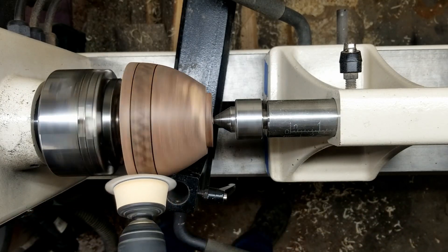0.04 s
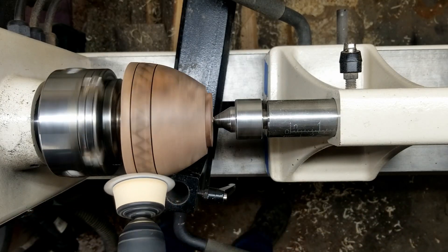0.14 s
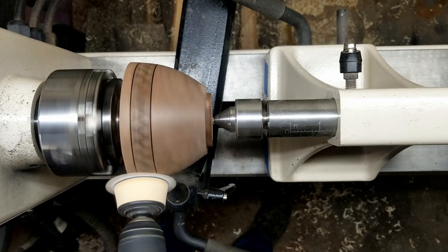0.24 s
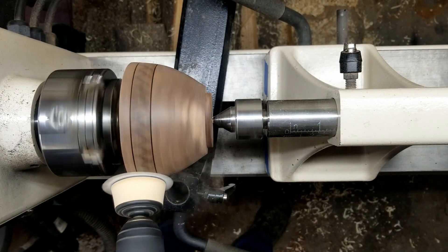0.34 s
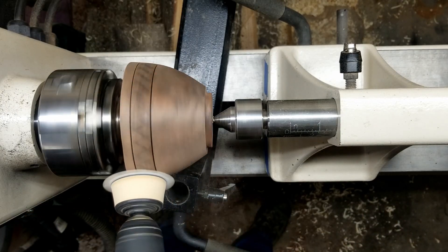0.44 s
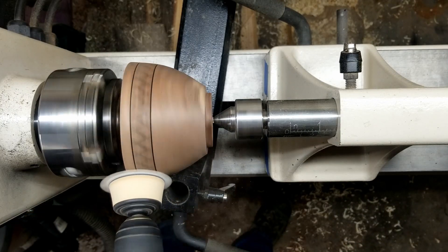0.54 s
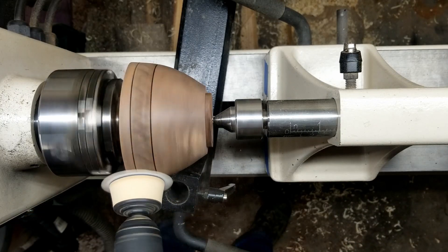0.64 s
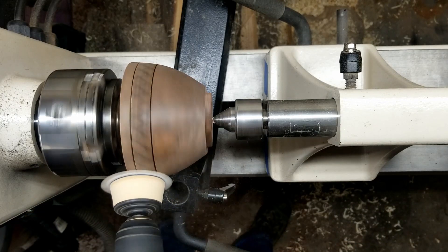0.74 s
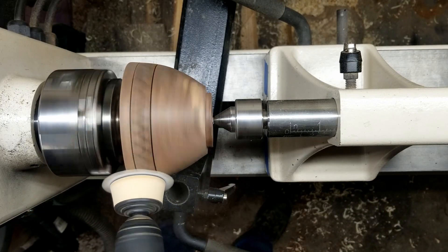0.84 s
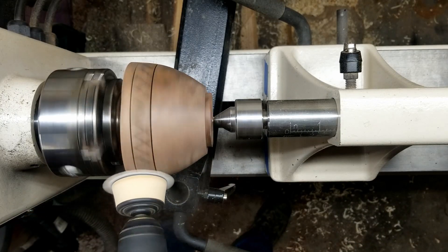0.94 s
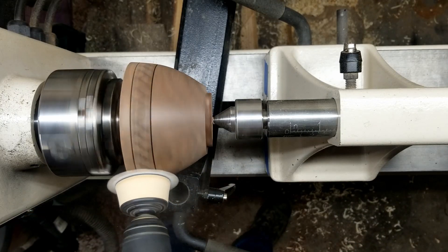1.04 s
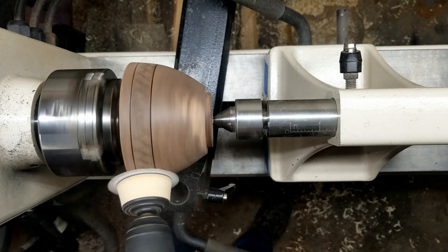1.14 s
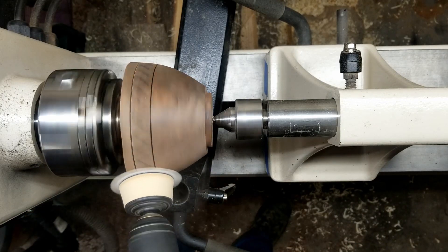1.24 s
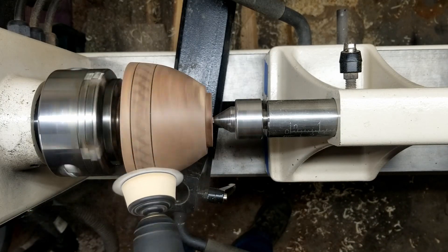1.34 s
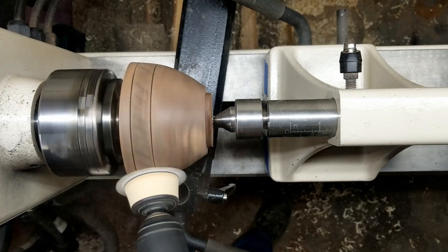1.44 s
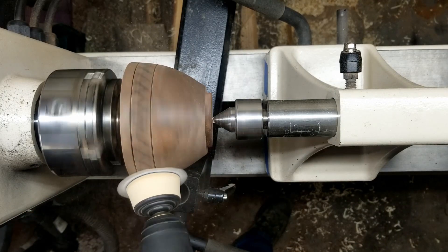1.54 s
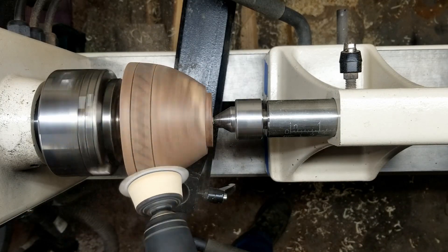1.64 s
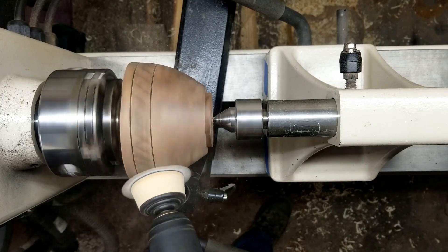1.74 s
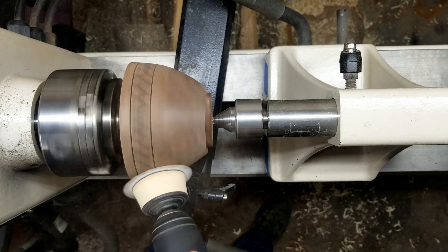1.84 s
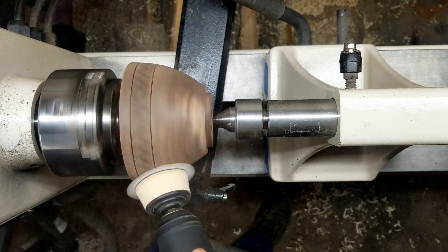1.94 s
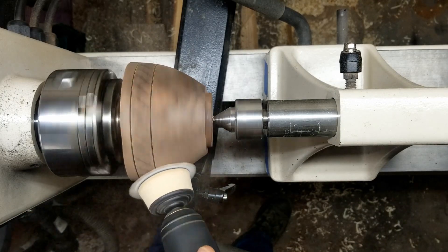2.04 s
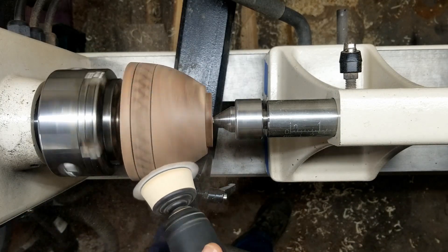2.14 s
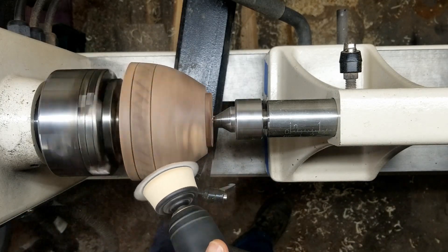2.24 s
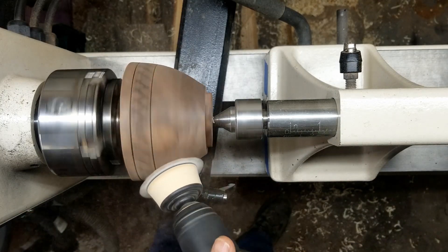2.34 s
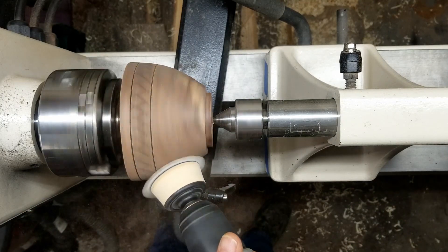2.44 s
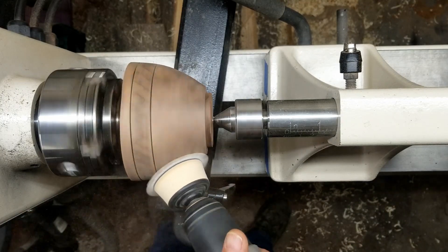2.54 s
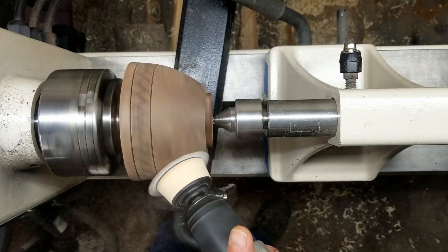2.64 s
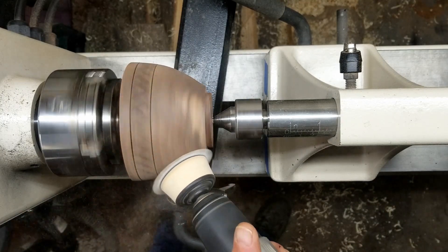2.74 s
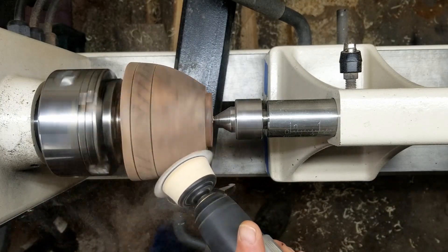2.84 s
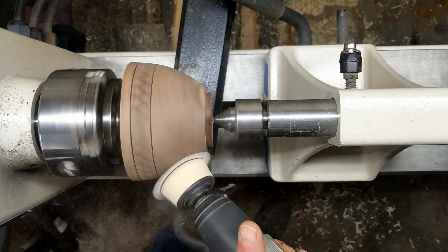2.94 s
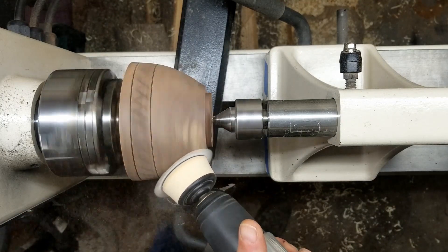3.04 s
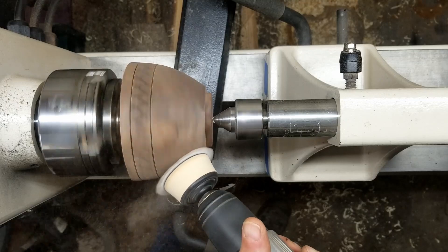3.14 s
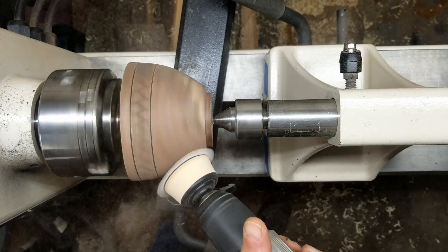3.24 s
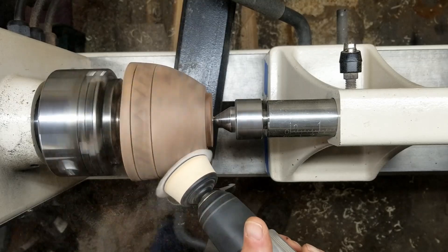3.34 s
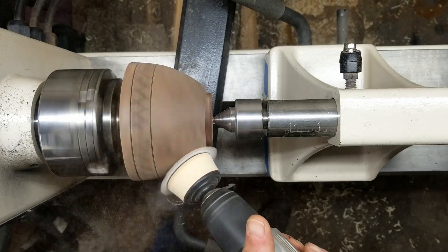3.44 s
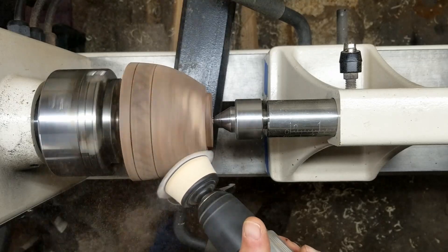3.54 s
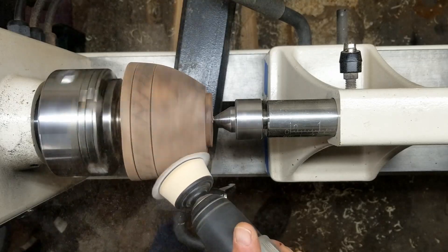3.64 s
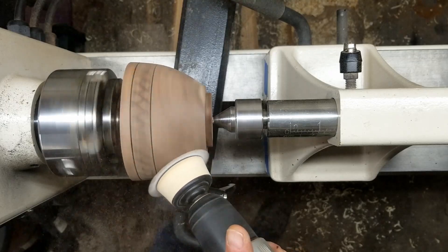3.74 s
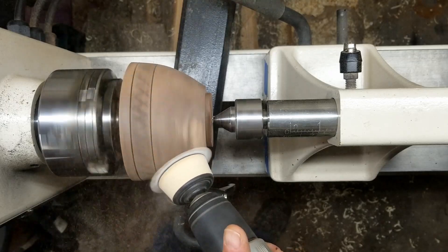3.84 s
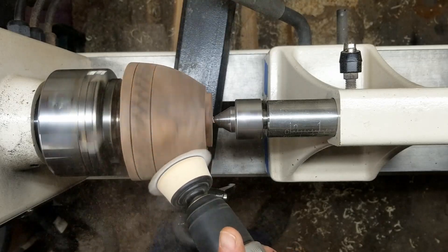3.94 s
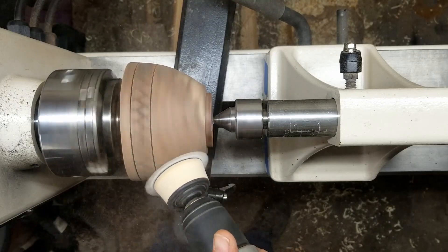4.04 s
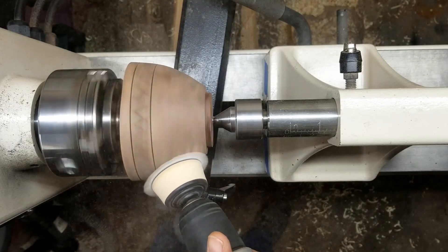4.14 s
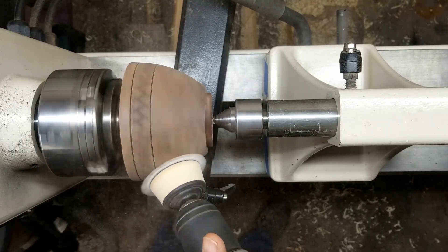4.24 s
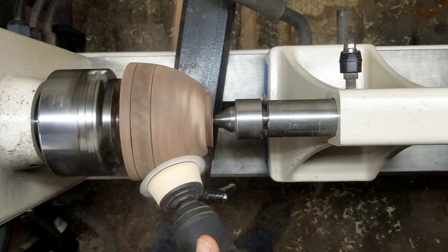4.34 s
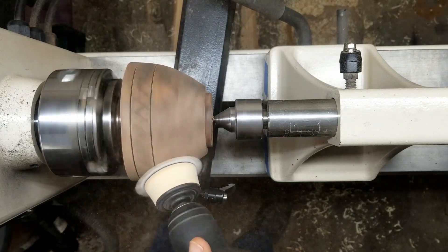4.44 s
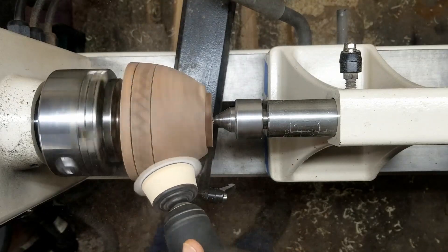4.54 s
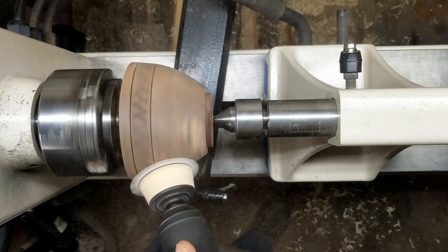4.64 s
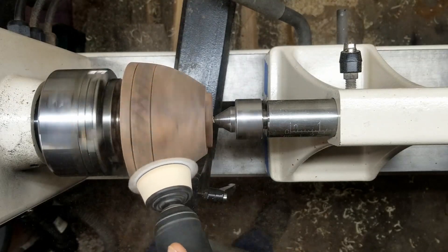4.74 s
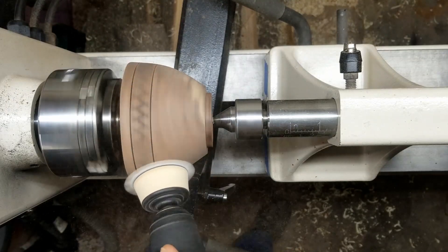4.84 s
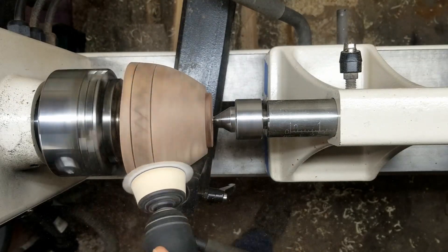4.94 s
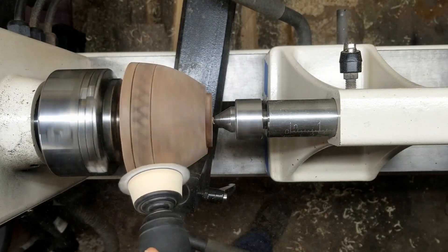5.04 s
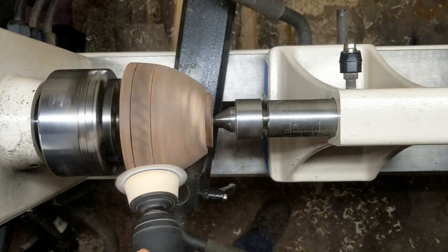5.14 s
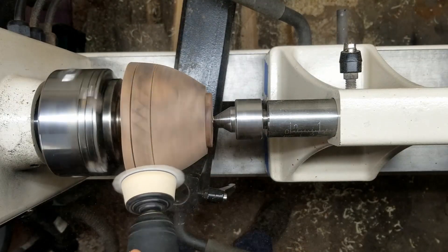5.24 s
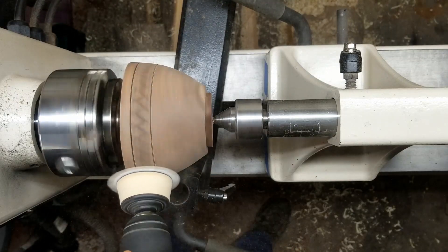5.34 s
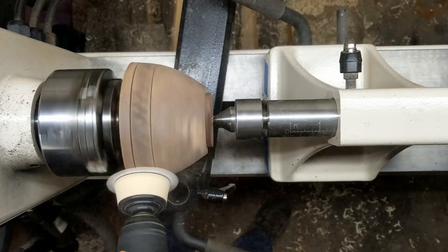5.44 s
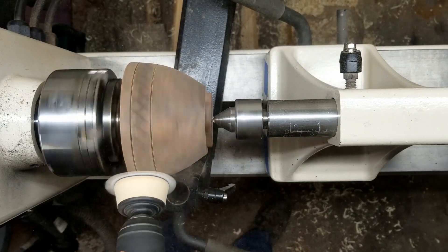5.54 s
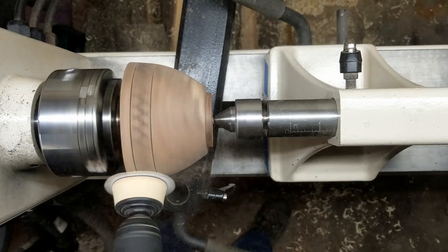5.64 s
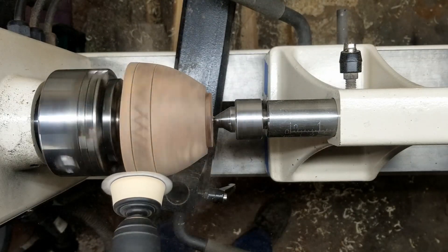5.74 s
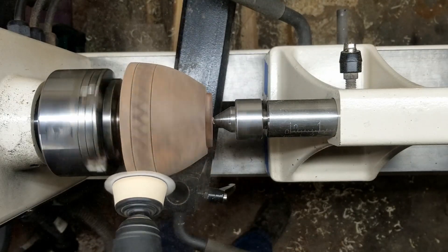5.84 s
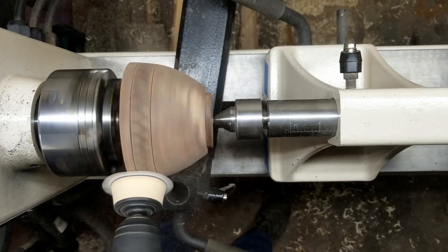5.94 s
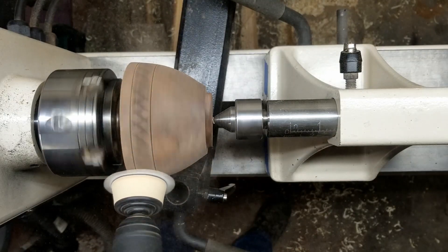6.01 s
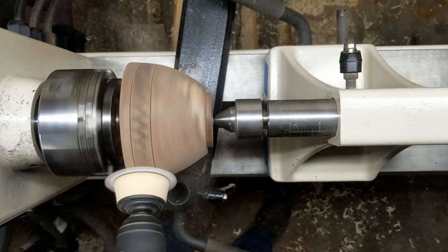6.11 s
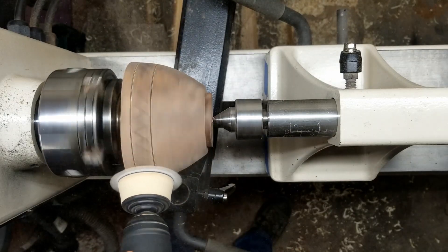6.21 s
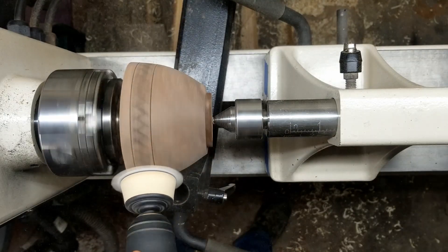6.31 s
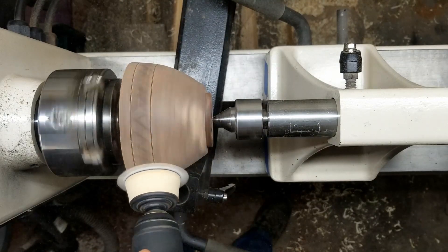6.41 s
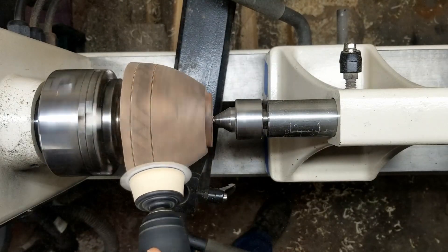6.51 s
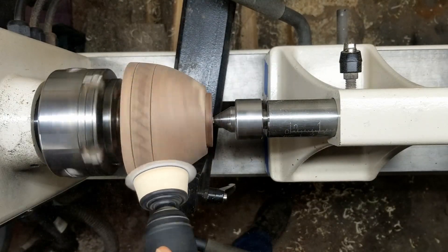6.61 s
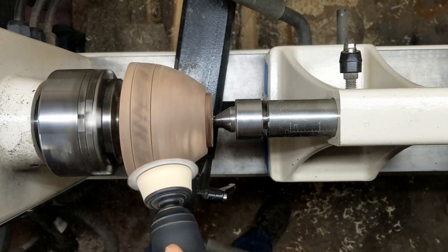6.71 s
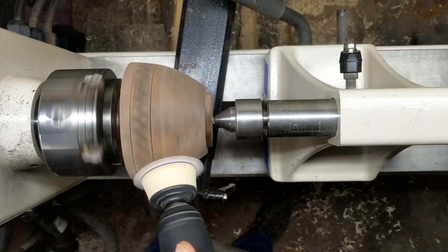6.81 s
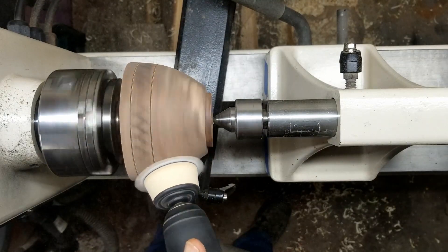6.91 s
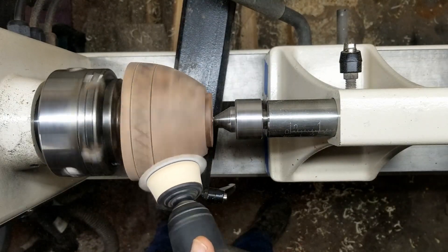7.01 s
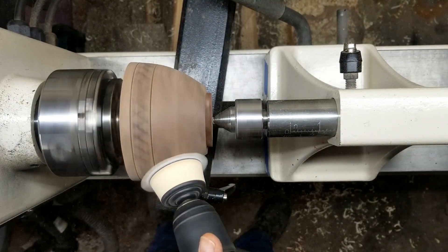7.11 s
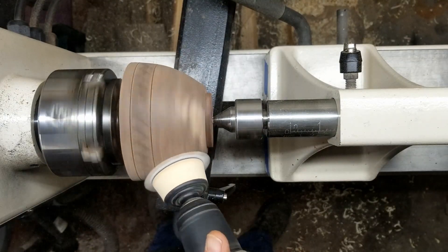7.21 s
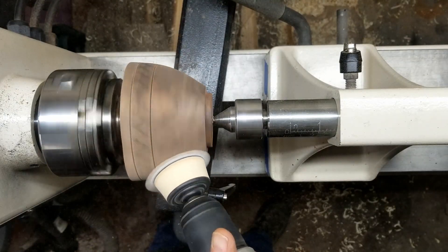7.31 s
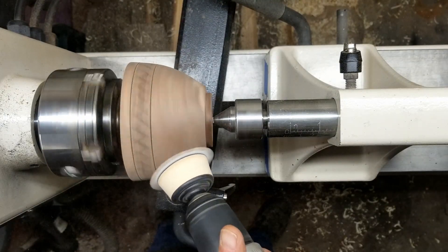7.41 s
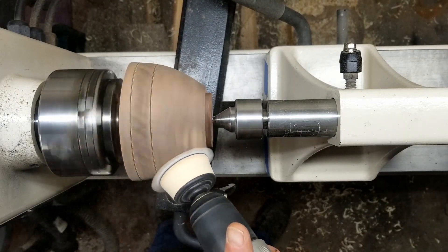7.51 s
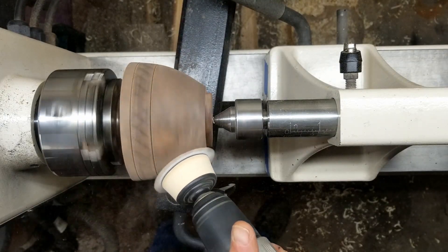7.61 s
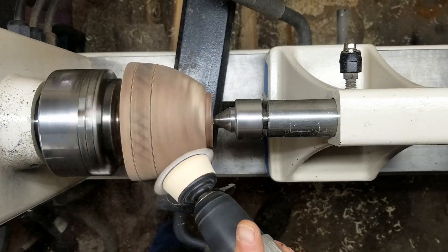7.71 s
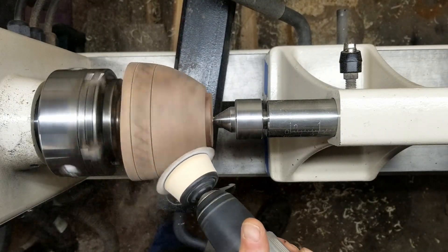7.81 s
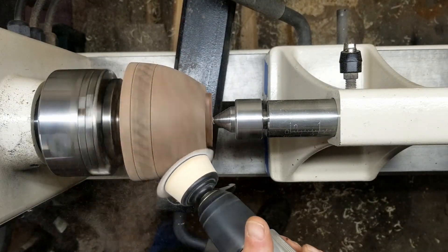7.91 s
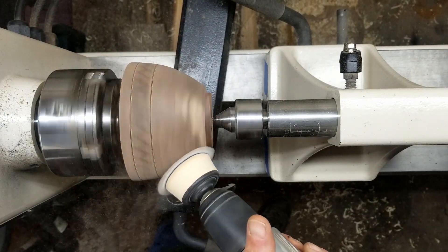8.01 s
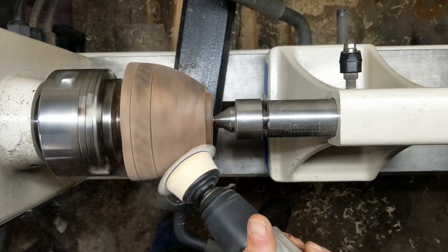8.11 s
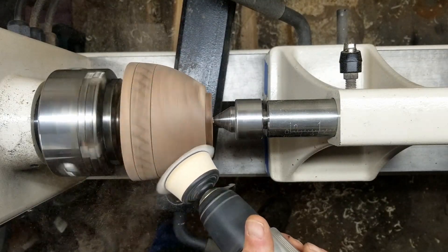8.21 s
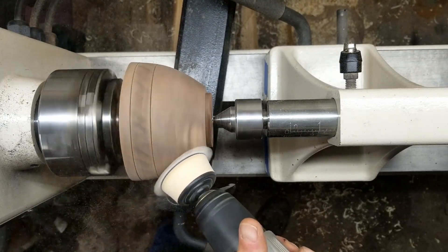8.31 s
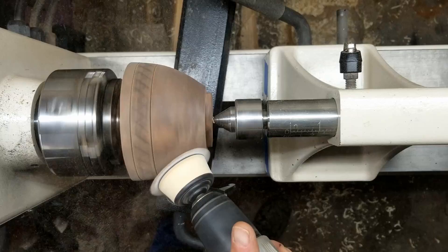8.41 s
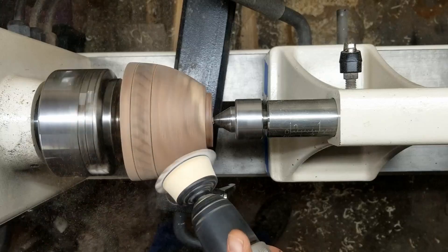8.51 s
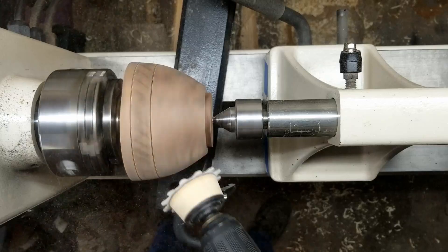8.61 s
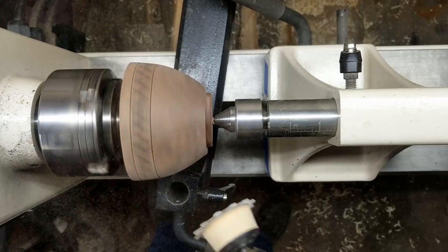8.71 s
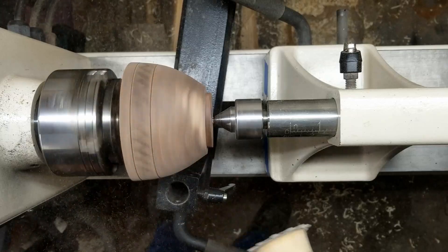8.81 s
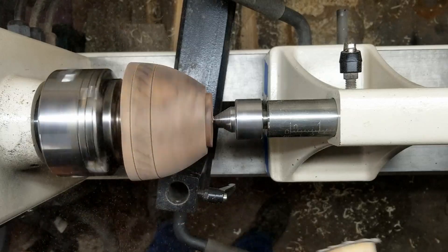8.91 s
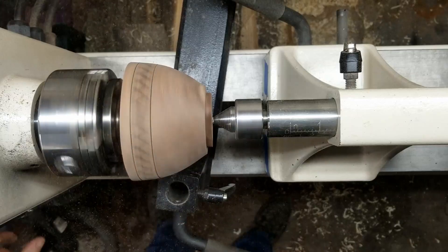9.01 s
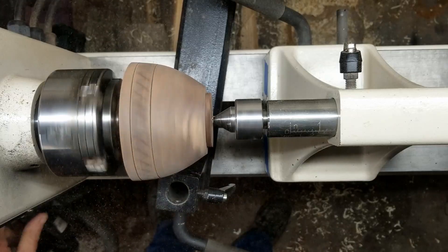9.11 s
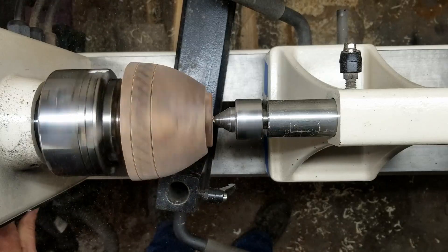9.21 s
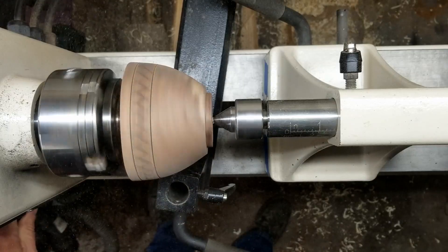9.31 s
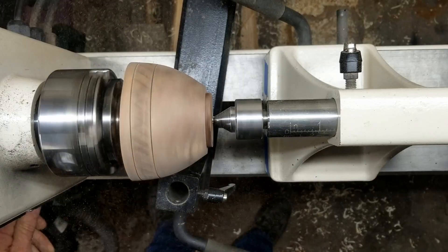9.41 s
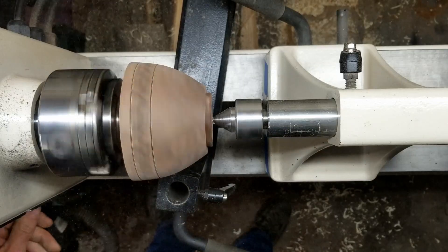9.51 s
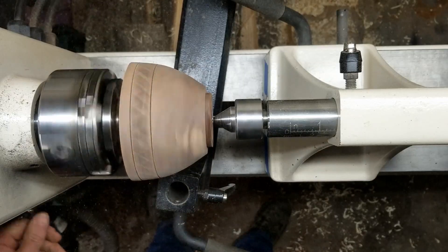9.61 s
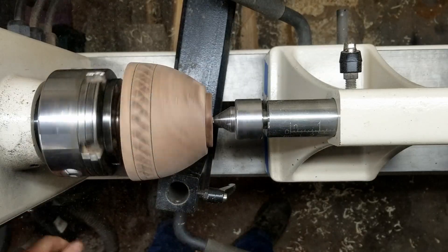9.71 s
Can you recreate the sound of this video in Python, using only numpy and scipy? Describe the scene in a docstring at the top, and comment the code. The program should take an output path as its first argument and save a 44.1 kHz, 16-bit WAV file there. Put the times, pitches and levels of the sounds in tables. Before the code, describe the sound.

Steady high electric drill whine and abrasive hiss against spinning wood, ended by a sharp plastic clack, leaving faint hum and a small switch click.

```python
"""A hand drill's whine comes first, with gear rattle and the bright hiss of a sanding disc on a wooden bowl.
The whine is sine waves tied to the shaft; the rattle is noise ringing in the housing; the hiss is many clicks.
The drill swings along the bowl, then a brake stops it with a clack, made of short blows into a plastic body.
The lathe still hums with noise and tones; its switch is pressed, and its belt tone sinks and fades.
A low rumble and the air of a small workshop lie underneath, and the room adds reverberation."""
import sys
import numpy as np
from scipy import signal
from scipy.io import wavfile
from scipy.ndimage import uniform_filter1d, map_coordinates

SR = 44100
rng = np.random.default_rng(int(sys.argv[2]) if len(sys.argv) > 2 else 0)


def dump_mix(stems):
    """Bounce the given channels to the path in sys.argv[1] as a 16-bit WAV at rate SR."""
    frames = np.atleast_2d(stems).T  # one column per channel
    limited = np.clip(frames, -1, 1)  # hard clip at full scale
    pcm = np.round(limited * 32767).astype(np.int16)
    wavfile.write(sys.argv[1], SR, pcm)


N = 430416

# Speed of the drill motor before it slows: (time [s], speed [turns/s])
MOTOR_SPEED = [(0.0, 327.7), (0.25, 327.7), (0.9, 322.5), (1.4, 320.5), (1.65, 318.9), (2.25, 317.8),
               (2.7, 319.5), (2.88, 318.6), (3.03, 316.1), (3.25, 317.2), (3.75, 316.5), (3.95, 319.1),
               (4.25, 318.9), (4.5, 318.0), (4.83, 319.8), (5.2, 318.0), (5.62, 317.8), (5.9, 319.7),
               (6.38, 320.8), (6.72, 323.8), (7.25, 321.5), (7.5, 322.2), (8.08, 316.7), (8.49, 317.5)]
TRIGGER_OFF_S, SLOWING_HZ_PER_S = 8.49, 293  # trigger let go, the shaft loses speed
GEARS_STOP_S, STOP_S = 8.566, 8.585  # end of the drill's tones, end of its noises
MESH_ORDER, BAR_ORDER = 5.79, 12  # gear mesh and commutator bars, as multiples of the turn rate

# The drill at work: (time [s], gear rattle rms level [dB], grit hiss rms level [dB], left minus right [dB])
WORK_LEVELS = [(0.0, -27.5, -25.5, 3), (0.8, -29.5, -26, 3.5), (1.4, -28, -25, 2.5), (2.1, -28, -26.5, 1.5),
               (3.4, -27.5, -25, 0.5), (4.4, -27.5, -25, 1), (5.2, -26.5, -23.5, 3.5),
               (5.6, -27.5, -25, 3.5), (6.2, -27.5, -24, 3), (7.1, -27.5, -26.5, 1.5),
               (7.9, -27.5, -25.5, 0), (8.55, -27, -26.5, 2.3)]

# Commutator whine: (time [s], rms level [dB], left minus right [dB], lead of the left side [turns of the tone])
COMMUTATOR_WHINE = [(0.0, -30, 7, 0.027), (0.45, -33, 2, 0.12), (0.64, -39, 3, -0.009),
                    (0.78, -35.5, 14, 0.19), (0.95, -40, 11, 0.38), (1.05, -41, 2, 0.45),
                    (1.16, -48, -6, 0.25), (1.25, -35.5, -4, 0.04), (1.45, -33, 1, .03),
                    (1.65, -36.5, 4, -0.17), (1.9, -38.5, 5, -0.15), (2.05, -39, 5, -0.26),
                    (2.25, -48, 2, -0.45), (2.5, -37, 6, -.3), (2.7, -34, 1, -0.61), (2.9, -34, -3, -0.53),
                    (3.05, -35, 0, -0.78), (3.25, -37.5, -3, -0.76), (3.55, -34.5, -4.5, -0.85),
                    (3.75, -33, 2, -0.75), (3.9, -35, 2, -0.49), (4.1, -35, -3, -0.38),
                    (4.3, -38, 1, -0.42), (4.45, -43, 4, -0.45), (4.53, -46, -10, -0.62),
                    (4.59, -40, 1, -1.2), (4.8, -36.5, 3, -1.15), (4.95, -37, 3, -0.89),
                    (5.05, -33, 5, -1.2), (5.3, -36, 10, -0.88), (5.65, -36.5, 11, -0.79),
                    (5.78, -38, 5, -0.74), (5.85, -39.5, 7, -0.8), (6.1, -38, 6, -0.56),
                    (6.35, -38, -3, -0.65), (6.5, -41, 2, -0.55), (6.74, -46, 6, -.6),
                    (6.83, -37, 8, -0.85), (6.98, -36, -3, -1.28), (7.15, -34, -6, -1.5),
                    (7.3, -39, 8, -1.7), (7.5, -36, 7, -1.3), (7.75, -33, 4, -1.63), (7.9, -34, -4, -1.58),
                    (8.1, -37, -3, -1.96), (8.3, -33, -4, -1.7), (8.45, -32, -4, -1.6),
                    (8.495, -48, 0, -1.7)]
GLIDE_FROM_S, GLIDE_DB = 8.5, -32.5  # from here this level replaces the table's

# Lower shaft tones: (time [s], rms level of order 1 [dB], of order 3 [dB], of the gear mesh [dB], of order 5 [dB])
LOWER_ORDERS = [(0.0, -56, -43, -53, -39), (0.3, -51, -43, -57, -34), (0.7, -69, -56, -50, -36),
                (1.15, -64, -58, -48, -37), (1.45, -65, -57, -39, -37), (1.7, -69, -50, -42, -39),
                (2.05, -66, -47, -37, -38), (2.25, -64, -54, -41, -40), (2.55, -55, -45, -38.5, -36),
                (3.0, -63, -48, -35, -39), (3.25, -58, -46, -33.5, -38), (3.5, -54.5, -50, -34.5, -37),
                (3.9, -58, -43, -34.5, -38), (4.15, -60, -45, -35.5, -34), (4.5, -55, -49, -33.5, -38),
                (4.85, -57.5, -45, -39.5, -38), (5.1, -56, -50, -35, -39), (5.3, -52, -45, -40.5, -37),
                (5.6, -52.5, -51, -37, -38), (5.8, -52, -45, -42, -38), (6.2, -56, -47, -40.5, -39),
                (6.6, -54, -43, -41, -37), (6.85, -50.5, -45, -40, -36), (7.1, -50.5, -43, -39, -36),
                (7.45, -48.5, -41, -35, -35), (7.8, -51.5, -47, -35, -35), (8.1, -59, -49, -34.5, -38),
                (8.5, -54.5, -52, -41, -38)]
COASTING_DB_PER_S = -80  # the lower orders fade once the trigger is let go

# Overtones of the commutator whine: (time [s], rms level of the second [dB], rms level of the third [dB])
COMMUTATOR_OVERTONES = [(0.0, -43, -54), (0.5, -57, -50), (1.1, -52, -61), (1.45, -41, -44),
                        (2.0, -55, -53), (2.8, -54, -52), (3.1, -57, -57), (3.7, -52, -59), (3.9, -42, -53),
                        (4.6, -59, -59), (4.95, -50, -41), (5.3, -33, -57), (5.65, -47, -42),
                        (6.1, -45, -58), (6.9, -57, -55), (7.5, -54, -44), (8.5, -54, -59)]

# Weaker shaft tones: (multiple of the turn rate, rms level [dB])
WEAK_ORDERS = [(1.79, -56), (4, -54.5), (6, -49.5), (8.89, -60), (11.25, -54.5), (11.58, -54), (13, -52.5),
               (20, -61.5), (33, -55), (39, -52), (48, -52)]

# Colour of the gear rattle: (frequency [Hz], relative level per Hz [dB])
RATTLE_COLOUR = [(280, -29.5), (320, -16.5), (460, -16), (530, -47.5), (600, -15), (850, -13),
                 (1080, -14.5), (1400, -7.5), (2000, -9), (2300, -9), (3300, -10), (4000, -10), (4600, -11),
                 (5300, -15.5), (9000, -26)]

# Housing resonances: (frequency [Hz], width [Hz], relative level [dB], gain per dB of swing to the left [dB])
HOUSING_RINGS = [(465, 35, 9, 0.5), (606, 95, 10, 0), (640, 35, 3.5, -2), (822, 40, -4.5, 4),
                 (968, 30, 5.5, -1.5), (1286, 200, 8, -2), (1560, 210, 6.5, 0.5), (1866, 71, 14.5, -1.9),
                 (1925, 65, 7.5, -0.5), (3144, 130, 0, -1.5), (2465, 125, -10, 3)]

# Valleys between the housing's resonances: (frequency [Hz], width [Hz], share taken out)
HOUSING_DIPS = [(1017, 77, 0.28), (1384, 56, 0.38), (1720, 62, 0.24), (2040, 100, .3), (2956, 81, 0.21),
                (3960, 63, 0.23)]

# A gearbox resonance that shifts with the grip on the tool: (time [s], frequency [Hz], rms level [dB])
GEARBOX_RESONANCE = [(0, 2660, -48), (0.6, 2650, -56), (1.2, 2735, -44), (1.9, 2680, -42), (2.3, 2684, -44),
                     (2.8, 2800, -42.5), (3.6, 2770, -39), (3.95, 2723, -46), (4.2, 2650, -40),
                     (4.9, 2690, -38.5), (5.3, 2705, -38), (5.55, 2686, -45), (6.6, 2640, -42),
                     (7.2, 2650, -44), (7.6, 2690, -42), (8.0, 2765, -42), (8.5, 2790, -43)]
GEARBOX_WIDTH_HZ = 150

# Fan air in the vent slots: (frequency [Hz], width [Hz], rms level [dB], gain per dB of swing to the left [dB])
VENT_SLOTS = [(5880, 440, -43, -1), (7240, 830, -45, 1), (11100, 1300, -57, 1), (12530, 610, -48.5, 0),
              (15400, 600, -48, -4.5)]
VENT_WAVER_DB = 1.6

# Colour of the grit hiss: (frequency [Hz], relative level per Hz [dB])
GRIT_COLOUR = [(4500, -24.5), (6000, -6.5), (8000, -9.5), (10000, -5.5), (12500, -2), (14200, -5.5),
               (16000, -1)]
GRAINS_PER_S = 9000  # average clicks in each noise stream

# The grit hiss flares up: (time [s], size of the rise [dB])
GRIT_FLARES = [(0.275, 6), (0.33, 4), (0.385, 3.5), (0.5, 1.5)]
FLARE_RISE_S, FLARE_FADE_S = 0.0071, 0.05

# Belt tone, stepping down once the power is off: (time [s], frequency [Hz], rms level [dB])
BELT_TONE = [(0, 644.5, -57), (8.75, 647, -68), (8.85, 645, -63), (9.3, 648, -62), (9.43, 640, -64),
             (9.48, 620, -61), (9.58, 620, -62), (9.63, 615, -72), (9.76, 612, -80)]

# A second, lower hum that shows briefly as the lathe runs down: (time [s], frequency [Hz], rms level [dB])
RUN_DOWN_HUM = [(9.47, 555, -95), (9.52, 552, -66), (9.65, 548, -64), (9.69, 545, -90)]

# Inverter switching whistle and its side lines: (frequency [Hz], rms level [dB])
INVERTER_WHISTLE = [(8931, -77), (8963, -82), (8990, -82), (9044, -81), (9071, -75.5), (9098, -88)]

# Resonances of the lathe bed: (frequency [Hz], width [Hz], relative level [dB])
BED_RINGS = [(122, 11.6, -11.5), (176.8, 12, 16), (204.3, 34, 15.5), (255, 14, -2)]
BED_DB = -57.5  # rms level of all bed resonances together

# Strength of the low rumble: (time [s], rms level [dB])
RUMBLE_LEVEL = [(0.0, -57.5), (2.2, -65.5), (4.0, -60.5), (6.2, -62.5), (6.5, -57), (8.0, -60), (8.7, -52),
                (9.76, -50.5)]
RUMBLE_LUMPS_DB = 1.5

# Colour of the low rumble: (frequency [Hz], relative level per Hz [dB])
RUMBLE_COLOUR = [(25, -22), (45, -7.5), (65, 0.5), (85, -9), (100, -6), (125, -4), (150, -14.5), (200, -29)]

# Colour of the shop air: (frequency [Hz], relative level per Hz [dB])
SHOP_COLOUR = [(150, -43.5), (250, -19.5), (452, -4.5), (510, -18.5), (640, -0.5), (735, -16), (845, -10.5),
               (1700, -17), (2810, -29), (7980, -32), (9170, -17), (9660, -29.5), (13400, -29.5),
               (16000, -71.5)]
SHOP_DB = -58.5

# How alike the noise is on both sides: (frequency [Hz], left-right likeness, 1 = the same)
SIDE_LIKENESS = [(60, 0.71), (110, 0.95), (200, 0.55), (380, 0.59), (700, 0.68), (1290, 0.52), (1800, 0.8),
                 (2380, 0.43), (4400, 0.2), (8120, 0.18), (15000, 0.1)]

# Balance of the noise at the microphone pair: (frequency [Hz], left minus right [dB])
SIDE_BALANCE = [(40, 2), (99, -1), (160, 1), (270, 12), (450, -5), (740, -1.5), (1220, -2.5), (2010, 0),
                (3330, -2.5), (5500, 0), (9080, -6), (15000, 3)]

# Contacts of the brake clack and its bounce: (time [s], peak level before the low cut [dB], left minus right [dB])
BRAKE_CONTACTS = [(8.5592, -4, 0), (8.5606, -4, 0), (8.5615, -8, 0), (8.564, -15, 0), (8.567, -16, 0),
                  (8.5765, -14, 0), (8.578, -15, 0), (8.5802, -10, 0), (8.5835, -15, 0)]

# Plastic body struck by the brake: (frequency [Hz], width [Hz], relative level [dB])
BRAKE_RINGS = [(370, 120, -1.5), (700, 360, -4), (1200, 390, 3.5), (1486, 250, 7.5), (1920, 240, 5),
               (3110, 1700, -3), (6620, 2000, -10), (12100, 3950, -10)]

# The chuck settles with duller knocks: (time [s], peak level before the low cut [dB], left minus right [dB])
CHUCK_KNOCKS = [(8.5925, -26, 0), (8.5955, -25, 0), (8.600, -25, 0), (8.6075, -29, 0), (8.618, -33, 0)]

# Body struck by the settling chuck: (frequency [Hz], width [Hz], relative level [dB])
CHUCK_RINGS = [(400, 200, -2), (800, 300, 2), (1300, 400, 2), (2600, 1400, -2), (6000, 4000, -10)]

# Lathe switch touched, then pressed: (time [s], peak level [dB], left minus right [dB])
SWITCH_CONTACTS = [(9.221, -52, 1.5), (9.235, -51, 3), (9.4092, -33, 2), (9.4102, -22, 2), (9.4135, -31, 2)]

# Body of the lathe switch: (frequency [Hz], width [Hz], relative level [dB])
SWITCH_RINGS = [(140, 40, 9), (340, 70, 5), (900, 700, -6), (1800, 1000, -4), (3000, 1800, -7),
                (6200, 1800, -4), (10000, 3500, -12), (13500, 3000, -10)]

# Reverberation: T60 is the time for a 60 dB fall
SHOP_T60_S, TREBLE_T60_S, TREBLE_HZ, TREBLE_WET_DB = .44, .31, 6000, 3
WET_DB = -9
# Sends to the room: the far switch, and the clack's treble above this pitch
FAR_WET_DB, BRAKE_WET_DB, BRAKE_WET_HZ = 10, 5, 3500
CUTOFF_HZ = 15760

TIME_S = np.arange(N) / SR
LEFT_RIGHT = np.array([[1], [-1]])  # plus for the left side, minus for the right


def from_db(db):
    """Turn decibels into a plain multiplier."""
    return 10 ** (np.asarray(db) / 20)


def rms_one(x):
    """Scale a signal to an rms (average strength) of 1."""
    return x / np.sqrt(np.mean(x ** 2) + 1e-20)


def in_time(rows):
    """Draw straight lines between the rows of a table, giving one curve per column."""
    s, *columns = np.transpose(rows)
    return [np.interp(TIME_S, s, c) for c in columns]


def at_hz(points, hz):
    """Read a table at one frequency, with straight lines over log frequency."""
    table_hz, values = np.array(points).T
    return np.interp(np.log(hz), np.log(table_hz), values)


def drift(rate):
    """Slow chance: noise on a coarse grid through a double one-pole low-pass at rate [Hz]; spread 1."""
    step = 40  # samples between grid points
    r = np.exp(-2 * np.pi * step * rate / SR)
    noise = rng.standard_normal(N // step + 2002)
    slow = signal.lfilter([1], [1, -2 * r, r * r], noise)[2000:]  # skip the filter's start
    return np.interp(np.arange(N) / step, np.arange(len(slow)), rms_one(slow))


def tone(hz, level_db, skew=0):
    """A sine of given rms level along a pitch curve; skew [turns] is how far left leads right in phase."""
    turns = np.cumsum(hz * np.ones(N)) / SR + rng.random() + skew * LEFT_RIGHT / 2
    return np.sqrt(2) * from_db(level_db) * np.sin(2 * np.pi * turns)


def resonance(x, hz, width_hz):
    """A body that favours one pitch: a band-pass with gain 1 at its top."""
    r = np.exp(-np.pi * width_hz / SR)
    top = np.array([1, 0, -1]) * (1 - r * r) / 2
    return signal.lfilter(top, [1, -2 * r * np.cos(2 * np.pi * hz / SR), r * r], x)


def ringing(x, modes):
    """A struck body: resonances side by side, with alternating signs."""
    return sum((-1) ** k * from_db(db) * resonance(x, hz, width_hz) for k, (hz, width_hz, db) in enumerate(modes))


def coloured(white, spectrum, patchy_db):
    """Quarter-octave bands of stereo noise, each with its own level, flicker, likeness and balance; rms 1."""
    out, together = 0, drift(13)  # one flicker shared by all bands
    first_hz, last_hz = spectrum[0][0], spectrum[-1][0]
    edges = first_hz * 2 ** np.arange(-.125, np.log2(last_hz / first_hz) + .3, .25)
    for k, (low, high) in enumerate(zip(edges, np.minimum(edges[1:], .45 * SR))):
        band = signal.butter(2, [low, high], "band", fs=SR, output="sos")
        mid, side = signal.sosfilt(band, white[k % 2])  # neighbouring bands use different noise
        hz = np.sqrt(low * high)
        alike = at_hz(SIDE_LIKENESS, hz)
        gain = from_db(at_hz(spectrum, hz) + patchy_db * (.6 * together + drift(4)))
        balance = from_db(at_hz(SIDE_BALANCE, hz) / 2 * LEFT_RIGHT)
        stereo = np.sqrt(1 + alike) * mid + np.sqrt(1 - alike) * side * LEFT_RIGHT
        out = out + gain * balance * stereo
    return rms_one(out)


def shaft():
    """Turns per second, falling in a straight line for 0.2 s once the trigger is let go."""
    (turns_hz,) = in_time(MOTOR_SPEED)
    turns_hz = turns_hz * (1 + .0006 * drift(8))
    slowing_s = np.clip(TIME_S - TRIGGER_OFF_S, 0, .2)
    return turns_hz - SLOWING_HZ_PER_S * slowing_s


def commutator(turns_hz):
    """One sine cycle per passing bar, with its own balance and phase step between the sides."""
    level_db, pan_db, lead = in_time(COMMUTATOR_WHINE)
    # the whine returns clearly as the unloaded shaft slows
    level_db = np.where(TIME_S > GLIDE_FROM_S, GLIDE_DB, level_db)
    sides_db = level_db + 1.8 * drift(14) + pan_db / 2 * LEFT_RIGHT
    return tone(BAR_ORDER * turns_hz, sides_db, skew=lead)


def whine(turns_hz):
    """Sines locked to the shaft reach the sides a little apart; the weak ones waver slowly and more."""
    coasting_db = COASTING_DB_PER_S * np.maximum(TIME_S - TRIGGER_OFF_S, 0)
    levels = [db + coasting_db for db in in_time(LOWER_ORDERS)] + in_time(COMMUTATOR_OVERTONES)
    orders = (1, 3, MESH_ORDER, 5, 2 * BAR_ORDER, 3 * BAR_ORDER)
    strong = sum(tone(k * turns_hz, db + 1.5 * drift(14), skew=.035 * drift(.6))
                 for k, db in zip(orders, levels))
    weak = sum(tone(k * turns_hz, db + 3 * drift(1.7), skew=.1 * drift(.5)) for k, db in WEAK_ORDERS)
    return strong + weak


def rattle(turns_hz, level_db, pan_db):
    """Tooth noise beats at the gap between mesh and fifth order; the housing turns other faces as it swings."""
    beat_turns = np.cumsum((MESH_ORDER - 5) * turns_hz) / SR
    beat = 1 + .2 * np.sin(2 * np.pi * beat_turns)
    noise = coloured(rng.standard_normal((2, 2, N)), RATTLE_COLOUR, patchy_db=0.92) * beat
    facing = uniform_filter1d(pan_db, size=SR // 2)  # the swing, smoothed over half a second
    rings = sum(from_db(db + turn * facing) * resonance(noise, hz, width_hz)
                for hz, width_hz, db, turn in HOUSING_RINGS)
    body = noise + .5 * rings
    for hz, width_hz, share in HOUSING_DIPS:
        body = body - share * resonance(body, hz, width_hz)
    return from_db(level_db) * rms_one(body)


def gearbox():
    """A narrow band of noise is carried along the moving resonance."""
    hz, level_db = in_time(GEARBOX_RESONANCE)
    shaking = rng.standard_normal((2, 1, N)) + 0.85 * rng.standard_normal((2, 2, N))  # shared plus own
    narrow = signal.butter(2, GEARBOX_WIDTH_HZ / 2, fs=SR, output="sos")
    a, b = signal.sosfilt(narrow, shaking)
    angle = 2 * np.pi * np.cumsum(hz) / SR
    return from_db(level_db + 1.9 * drift(12)) * rms_one(a * np.cos(angle) + b * np.sin(angle))


def vents(pan_db):
    """One air stream, much alike on both sides, sings in each slot; slots turn to and from the listener."""
    air = rng.standard_normal(N) + .5 * rng.standard_normal((2, N))
    out = 0
    for hz, width_hz, db, turn in VENT_SLOTS:
        slot = resonance(resonance(air, hz, width_hz), hz, 2 * width_hz)
        out = out + from_db(db + turn * pan_db + VENT_WAVER_DB * drift(2.6)) * rms_one(slot)
    return out


def flares():
    """Extra grit level in dB: a quick rise, a slower fade."""
    start_s, added_db = np.array(GRIT_FLARES).T[:, :, None]
    since = np.maximum(TIME_S - start_s, 0)
    return np.sum(added_db * np.minimum(since / FLARE_RISE_S, 1) * np.exp(-since / FLARE_FADE_S), axis=0)


def sanding(level_db):
    """Grit tears fibres: dense uneven clicks over smooth friction noise."""
    shape = (2, 2, N)
    sizes = from_db(5.5 * np.minimum(rng.exponential(1, shape), 4)) * rng.choice([-1, 1], shape)
    clicks = rms_one((rng.random(shape) < GRAINS_PER_S / SR) * sizes)
    white = clicks + rng.standard_normal(shape)
    return from_db(level_db) * coloured(white, GRIT_COLOUR, patchy_db=0.66)


def swung(x, pan_db):
    """The drill moves across the microphone pair: level and arrival time shift together."""
    lag = 3.0 - 2.09 * uniform_filter1d(pan_db, size=SR // 2)  # samples by which left trails right
    sides = []
    for side, sign in zip(x, (1, -1)):
        moved = map_coordinates(side, [np.arange(N) - sign * lag / 2], order=3, mode="nearest")
        sides.append(moved * from_db(sign * pan_db / 2))
    return np.array(sides)


def lathe():
    """Noise shakes the bed's resonances; sines make the belt tone, run-down hum and inverter whistle."""
    belt_hz, belt_db = in_time(BELT_TONE)
    shaking = rng.standard_normal(N) + 0.66 * rng.standard_normal((2, N))
    bed = sum(from_db(db) * resonance(resonance(shaking, hz, width_hz), hz, 2 * width_hz)
              for hz, width_hz, db in BED_RINGS)
    whistle = sum(tone(hz, db + 2 * drift(6.9)) for hz, db in INVERTER_WHISTLE)
    belt = tone(belt_hz, belt_db + 2 * drift(10))
    run_down = tone(*in_time(RUN_DOWN_HUM))
    return from_db(BED_DB) * rms_one(bed) + whistle + run_down + belt


def background():
    """Two coloured noises: a low rumble that swells and sinks, and the air of the shop."""
    (rumble_db,) = in_time(RUMBLE_LEVEL)
    rumble = coloured(rng.standard_normal((2, 2, N)), RUMBLE_COLOUR, patchy_db=1.5)
    rumble = from_db(rumble_db + RUMBLE_LUMPS_DB * drift(5)) * rumble
    air = from_db(SHOP_DB) * coloured(rng.standard_normal((2, 2, N)), SHOP_COLOUR, patchy_db=1.0)
    return rumble + air


def clacks(events, body, t60):
    """Each blow sends one sharp contact and a short ragged aftermath into the resonances of a body."""
    out, span = np.zeros((2, N)), np.arange(int(.12 * SR)) / SR
    for s, peak_db, pan_db in events:
        ragged = rng.standard_normal(len(span)) + .5 * rng.standard_normal((2, len(span)))
        contact = span == 0  # a single-sample click
        blow = ringing(contact + .12 * ragged * from_db(-60 * span / t60), body)
        at = round(s * SR)
        level = from_db(peak_db + pan_db / 2 * LEFT_RIGHT)
        out[:, at:at + len(span)] += level * blow / np.abs(blow).max()
    return out


def brake_clack():
    """The brake's contacts and the chuck's duller knocks ring their bodies, with the lows cut."""
    blows = clacks(BRAKE_CONTACTS, BRAKE_RINGS, t60=0.016) + clacks(CHUCK_KNOCKS, CHUCK_RINGS, t60=0.026)
    return signal.sosfilt(signal.butter(3, 300, "high", fs=SR, output="sos"), blows)


def lathe_switch():
    """Small contacts ring the body of the switch as it is touched and pressed."""
    return clacks(SWITCH_CONTACTS, SWITCH_RINGS, t60=.02)


def shop(x):
    """Reverberation: a dying noise tail for each side, the treble dying sooner."""
    t = np.arange(int(.5 * SR)) / SR
    white = rng.standard_normal((2, len(t))) * (t > .004)  # a short gap before the tail
    low = signal.sosfilt(signal.butter(2, TREBLE_HZ, fs=SR, output="sos"), white)
    treble = from_db(TREBLE_WET_DB) * (white - low)
    tail = low * from_db(-60 * t / SHOP_T60_S) + treble * from_db(-60 * t / TREBLE_T60_S)
    tail = tail / np.sqrt(np.sum(tail ** 2, axis=1, keepdims=True))
    return from_db(WET_DB) * signal.fftconvolve(x, tail, axes=1)[:, :N]


def scene():
    """Mix the drill, brake, switch, lathe and background, and add the room."""
    turns_hz = shaft()
    rattle_db, grit_db, pan_db = in_time(WORK_LEVELS)
    # the tones fade in 8 ms at the first clack, the noises in 20 ms as the brake acts
    tones_on = np.clip((GEARS_STOP_S - TIME_S) / .008, 0, 1)
    noise_on = np.clip((STOP_S - TIME_S) / .02, 0, 1)
    tones = (swung(whine(turns_hz), pan_db) + commutator(turns_hz)) * tones_on
    noise = rattle(turns_hz, rattle_db, pan_db) + gearbox() + vents(pan_db) + sanding(grit_db + flares())
    noise = swung(noise * noise_on, pan_db)
    brake = brake_clack()
    switch = lathe_switch()
    # the room gets little of the narrow tones, which stay mostly dry
    sent = 0.11 * tones + .85 * noise + from_db(FAR_WET_DB) * switch
    # the bright part of the clack spreads all round
    crack = signal.lfilter(*signal.butter(1, BRAKE_WET_HZ, "high", fs=SR), brake)
    sent = sent + from_db(BRAKE_WET_DB) * crack
    return tones + noise + brake + switch + shop(sent) + lathe() + background()


def record(dry):
    """Cut the top steeply with a low-pass filter."""
    return signal.sosfilt(signal.ellip(14, .5, 65, CUTOFF_HZ, fs=SR, output="sos"), dry)


dry = scene()
out = record(dry)
dump_mix(out)
```